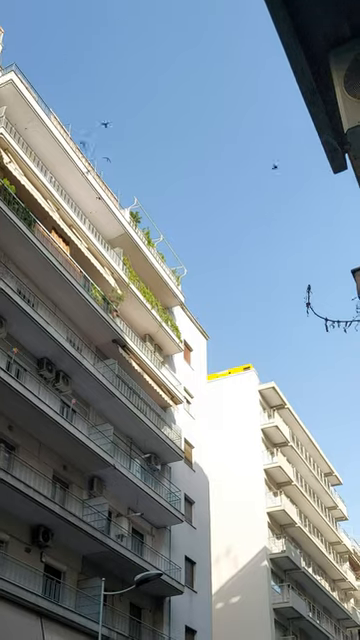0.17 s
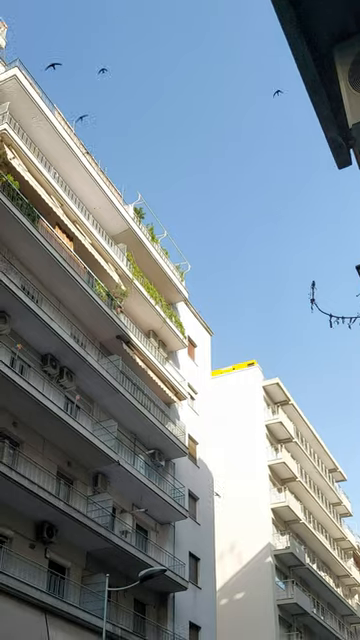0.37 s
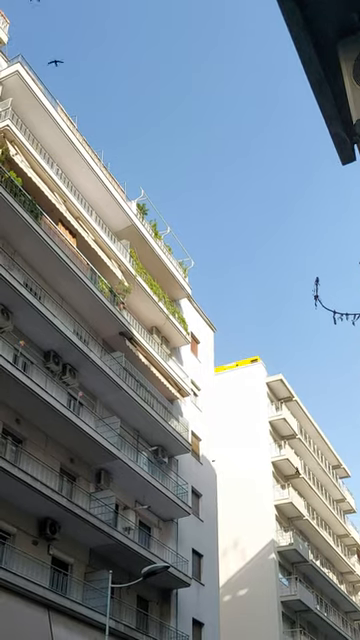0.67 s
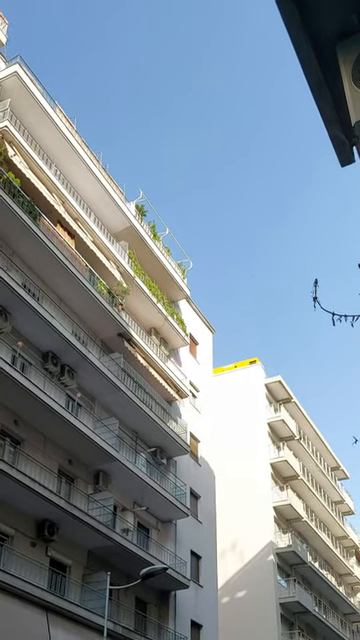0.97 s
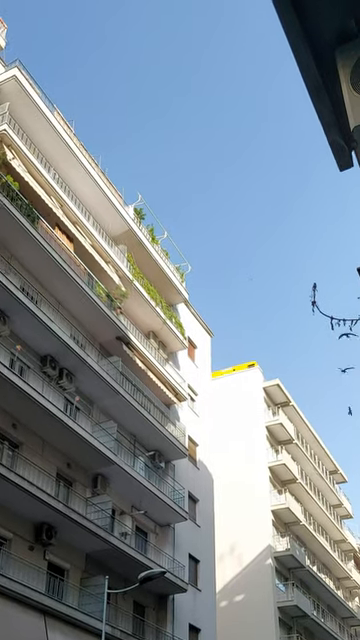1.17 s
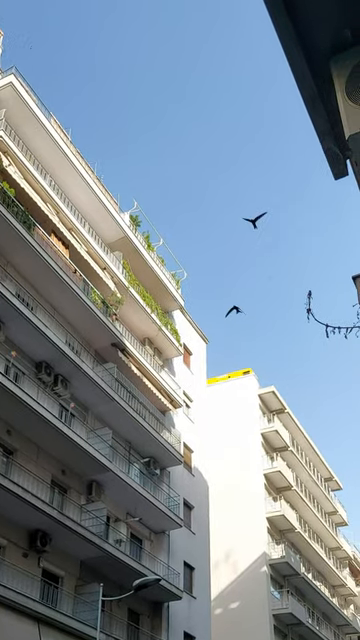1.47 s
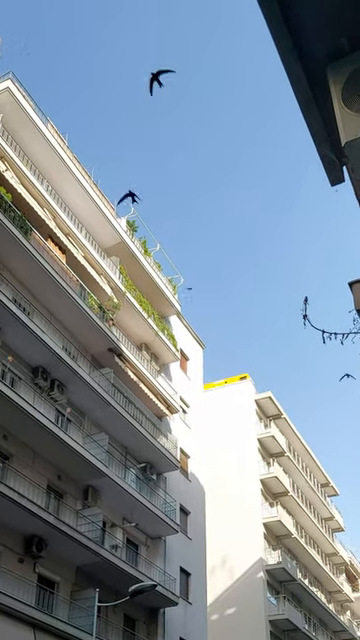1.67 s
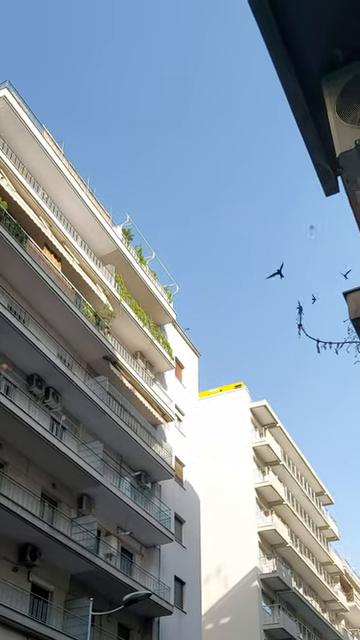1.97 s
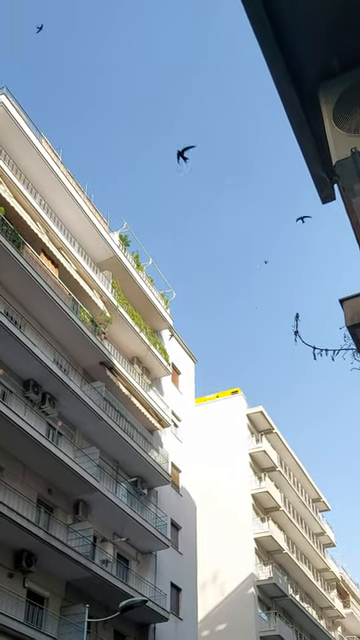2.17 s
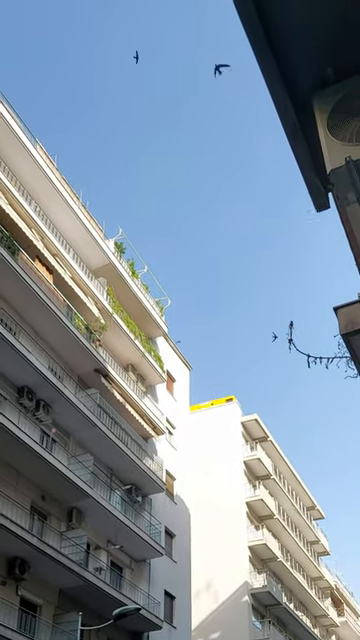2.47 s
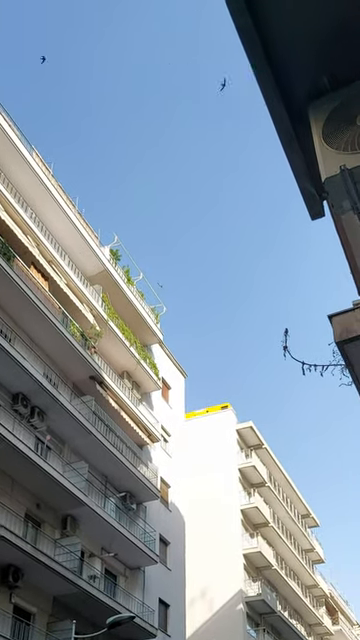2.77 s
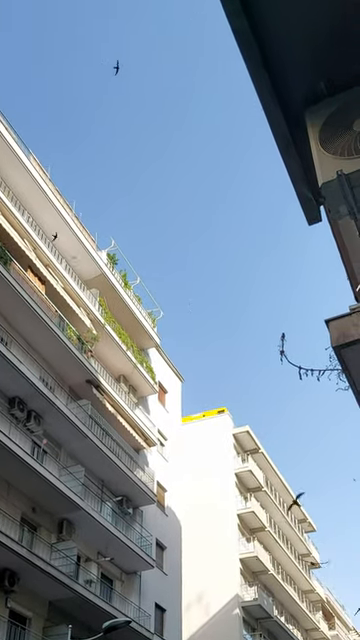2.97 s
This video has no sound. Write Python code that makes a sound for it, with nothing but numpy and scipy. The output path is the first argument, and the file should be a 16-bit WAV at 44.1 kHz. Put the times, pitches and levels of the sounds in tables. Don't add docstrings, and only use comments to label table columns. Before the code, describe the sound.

Shrill whistling swift screams, some ending in a low rasp, come in two flurries with long wall echoes; a lorry's deep rumble fades beneath the city wash, on a phone outdoors.

```python
import sys
import numpy as np
from scipy import signal
from scipy.fft import rfft, irfft
from scipy.io import wavfile
from scipy.ndimage import uniform_filter1d, map_coordinates

SR = 44100
rng = np.random.default_rng(int(sys.argv[2]) if len(sys.argv) > 2 else 0)


def elevation(decibels):
    levels = np.asarray(decibels, float)
    return 10 ** (levels / 20)


def master(y):
    cut = np.clip(np.atleast_2d(y).T, -1, 1)
    pcm = np.round(cut * 32767)
    wavfile.write(sys.argv[1], SR, pcm.astype(np.int16))


N = 138033


def evened(x):
    return x / np.sqrt(np.mean(x ** 2) + 1e-20)


def read(points, hz):
    f, value = np.transpose(points)
    return np.interp(np.log(hz + 1), np.log(f + 1), value)


def add(mix, s, sound):
    at = round(s * SR)
    sound = sound[max(-at, 0):]
    part = mix[max(at, 0):][:len(sound)]
    part += sound[:len(part)]


def wander(size, s):
    k = max(round(s * SR), 2)
    noise = rng.standard_normal(size)
    return evened(uniform_filter1d(uniform_filter1d(noise, k), k))


def coloured(x, table_db):
    gain = elevation(table_db(np.fft.rfftfreq(x.shape[-1], 1 / SR)))
    return irfft(rfft(x) * gain, x.shape[-1])


def ramps(t, length, attack_s, release_s):
    return np.clip(np.minimum(t / attack_s, (length - t) / release_s), 0, 1)


def wash(table, db, patchy_db, curve):
    # pitch_hz, likeness (share)
    likeness = [(40, 0.982), (180, 0.96), (350, 0.874), (700, 0.202), (1500, 0)]
    frames, hz = N // 512 + 5, np.fft.rfftfreq(2048, 1 / SR)
    a, b, c, d, patches = rng.standard_normal((frames, 1025, 5)).T
    patches = evened(uniform_filter1d(uniform_filter1d(patches, 14, 0), 6, 1))
    same = np.clip(read(likeness, hz), 0, 1)[:, None]
    left = a + 1j * b
    right = same * left + np.sqrt(1 - same ** 2) * (c + 1j * d)
    frame_s = np.arange(frames) * 512 / SR
    level_db = read(table, hz)[:, None] + patchy_db * patches + curve(hz[:, None], frame_s)
    z = np.array([left, right]) * elevation(level_db)
    return elevation(db) * evened(signal.istft(z, nperseg=2048, noverlap=1536)[1][:, :N])


def city():
    # pitch_hz, level_db (per Hz)
    far_streets = [(88, -38), (150, -3.5), (177, -16), (361, -9), (439, -11), (681, -13.5), (785, -11),
                   (3300, -25.5), (4290, -29), (7260, -120)]
    # pitch_hz, level_db (per Hz)
    hiss = [(2500, -69.5), (3300, 1.5), (6000, -1), (8200, -3), (8900, -17), (12000, -14.5), (15800, -21)]
    # time_s, level_db
    swell = [(0, 0.5), (.6, 2), (1.0, 1.5), (1.7, -0.5), (2.3, .5), (3.13, 1)]
    traffic = lambda hz, t: np.interp(t, *np.transpose(swell)) + 0 * hz
    return wash(far_streets, -39.5, 0.764, traffic) + wash(hiss, -56.5, 0.524, traffic)


def rumble():
    # pitch_hz, level_db (per Hz)
    engines = [(18, -42.5), (30, -27.5), (48, 1), (78, 6), (135, -2.5), (166, -20), (194, -3.5),
               (220, -6.5), (290, -13), (480, -120)]
    # time_s, level_db
    lorry = [
        (0, 6),
        (1.0, -4),
        (1.6, -48),
        (3.13, -25.5),
    ]
    leaving = lambda hz, t: np.interp(t, *np.transpose(lorry)) * (hz < 62)
    return wash(engines, -37.5, 0.94, leaving)


def squeaks():
    # start_s, length_s, pitch_hz, level_db
    tones = [
        (0.086, 0.185, 1723, -50.5),
        (0.46, 0.253, 1613, -48),
        (0.546, 0.32, 690.5, -48),
        (1.358, 0.133, 1020, -45),
    ]
    out = np.zeros(N)
    for start, length, hz, db in tones:
        t = np.arange(0, length, 1 / SR)
        pitch = hz * (1 - 0.01267 * t / length + 0.0086 * wander(len(t), 0.0497))
        level = elevation(db + 5.97 * wander(len(t), 0.051)) * np.sin(np.pi * t / length)
        add(out, start, level * np.sin(2 * np.pi * np.cumsum(pitch) / SR))
    return out * elevation([[1.5], [-1.5]])


def syrinx(hz, partials_db, warble, jitter, flutter_db, jitter_s=0.001572):
    n = len(hz)
    warble_per_s = 370 * (1 + .1 * wander(n, .01))
    beat = np.sin(2 * np.pi * np.cumsum(warble_per_s) / SR)
    pitch = hz * (1 + warble * beat + jitter * wander(n, jitter_s) + .003 * wander(n, .012))
    turn = 2 * np.pi * np.cumsum(pitch) / SR
    voice = np.zeros(n)
    for k, db in enumerate(partials_db):
        voice += elevation(db + flutter_db * wander(n, 0.00384)) * np.sin((k + 1) * turn)
    return np.sqrt(2) * voice


def far_scream(start, length, top_hz, db, rise):
    far_partials = (-2, -22, -28)
    t = np.arange(0, length, 1 / SR)
    low = np.clip(1 - t / rise, 0, 1) ** 1.6
    fall = np.clip((t / length - 1) / 0.64 + 1, 0, 1) ** 2
    hz = top_hz * (1 - 0.1 * low - 0.11 * fall - 0.055 * t / length)
    shape = np.sin(np.pi * t / length) ** .6 * elevation(db - 3 * low)
    return start, shape * syrinx(hz, far_partials, warble=.05, jitter=.04, flutter_db=3.0)


def rasp(start, length, hz, db):
    rasp_partials = (5.5, -5, -12.5)
    t = np.arange(0, length, 1 / SR)
    shape = ramps(t, length, 0.00303, 0.0154) * elevation(db - 3.76 * t / length)
    falling = hz * (1.03 - .08 * t / length)
    return start, shape * syrinx(falling, rasp_partials, warble=.02, jitter=.068, flutter_db=2.0, jitter_s=.0006)


def scream(arch, hoarse, overtones_db):
    near_partials = (0, -24, -21)
    s, hz, db = np.transpose(arch)
    length = s[-1] - s[0]
    t = np.arange(s[0], s[-1], 1 / SR)
    fray = 1 + 2 * ((t - s[0]) / length) ** 2
    hz = uniform_filter1d(np.interp(t, s, hz), round(0.014 * SR), mode="nearest")
    shape = ramps(t - s[0], length, .005, .015) * elevation(np.interp(t, s, db))
    partials_db = near_partials + overtones_db * np.array([0, 1, 1])
    warble, jitter = .008 * fray, .004 * fray * hoarse ** 2
    return s[0], shape * syrinx(hz, partials_db, warble, jitter, flutter_db=3.0)


def street(x, gap_s):
    # pitch_hz, t60_s
    decay = [(3500, 2.66), (5500, 1.475), (8000, 0.74), (13000, 0.82)]
    out, turn = np.zeros((2, N)), np.arange(N) / SR * 3 * np.pi
    for k in range(3):
        late = np.clip(np.arange(2 * SR) / SR / gap_s - .5, 0, 1)
        taps = rng.standard_normal((2, 2 * SR)) * late
        hz, t, z = signal.stft(taps, SR, nperseg=256)
        slope = -60 * t / read(decay, hz)[:, None]
        fading = elevation(slope) + 0.84 * elevation(3.44 * slope)
        tail = signal.istft(z * fading, SR, nperseg=256)[1]
        doppler = np.cumsum(.015 * wander(N, .015))
        moved = map_coordinates(x, [np.arange(N) + doppler], order=5)
        facing = moved * np.cos(turn + k * np.pi / 3)
        out += signal.fftconvolve(facing[None], tail / np.linalg.norm(tail[0]), axes=1)[:, :N]
    return out * np.sqrt(2 / 3)


def swifts():
    # time_s, pitch_hz, level_db
    first_flock = [
        [(.42, 4124, -51), (.47, 4303, -47.5), (.52, 4412, -49), (.575, 4517, -53)],
        [(.162, 4000, -37), (.19, 4717, -33.5), (.215, 5022, -31.5), (.24, 4977, -32.5), (.265, 4828, -39),
         (.29, 5015, -42), (.32, 4650, -51)],
        [(.575, 4380, -43), (.61, 4688, -33.5), (.665, 4823, -37.5), (.72, 4616, -36), (.8, 4466, -41)],
        [(.605, 4730, -33.5), (.635, 5144, -30.5), (.655, 5269, -31), (.7, 5113, -34.5), (.75, 4812, -36),
         (.79, 4706, -44)],
        [(.67, 5150, -42.5), (.7, 5484, -38), (.76, 5347, -43.5), (.82, 5320, -46)],
        [(.865, 4500, -35.5), (.885, 4700, -34), (.925, 4240, -45.5)],
    ]
    # time_s, pitch_hz, level_db
    second_flock = [
        [(1.74, 4400, -53.5), (1.765, 4765, -44.5), (1.83, 4930, -40.5), (1.88, 4880, -39.5),
         (1.95, 4240, -49.5)],
        [(1.965, 4194, -44.5), (1.982, 4214, -36.5), (2.0, 4650, -34.5), (2.03, 4680, -32.5),
         (2.065, 4639, -26.5), (2.095, 4451, -30.5), (2.105, 4540, -40.5), (2.135, 4468, -42.5)],
        [(2.34, 3842, -43), (2.358, 4050, -37), (2.372, 4300, -36), (2.39, 4020, -37), (2.43, 3509, -39.5)],
        [(2.692, 4350, -53.5), (2.708, 4860, -34.5), (2.73, 4900, -29), (2.748, 4760, -31.5), (2.76, 4670, -27),
         (2.77, 4720, -33), (2.785, 4790, -27), (2.798, 4740, -33.5), (2.81, 4729, -32), (2.85, 4265, -32)],
        [(2.9, 4540, -31.5), (2.935, 5091, -39.5), (2.965, 5281, -38), (3.02, 4920, -32.5)],
        [(2.935, 4000, -35), (2.965, 4356, -39), (2.995, 4667, -33), (3.025, 4440, -35.5), (3.045, 4042, -32.5),
         (3.065, 4021, -35)],
    ]
    # hoarseness (factor), overtones_db, left_right_db
    voices = [(1.566, 2, 12.5), (1.38, 3, 1.5), (1.14, 1.5, 6.5), (1.178, 2.5, 5.5), (1.4, 6, 14.5),
              (1.04, -3, -2), (1.04, 5, 1), (0.96, 2.5, 0.5), (2.4, 3.5, 2.5), (.9, 3, 3), (1.07, -13.5, 9),
              (2.5, 3, -0.5)]
    # start_s, length_s, top_pitch_hz, level_db, rise_s
    far_calls = [(-.05, 0.25, 5689, -48.5, .02), (-.05, 0.32, 4464, -48, .02),
                 (0.41, 0.1686, 4623, -39, .12), (.66, .16, 5100, -43.5, 0.02905),
                 (0.781, .12, 5276, -49.5, 0.0288), (0.98, 0.089, 4640, -50.5, 0.027),
                 (1.348, .15, 5834, -59, 0.086), (2.182, 0.069, 4842, -51.5, 0.0373),
                 (2.95, 0.14, 5250, -46.5, 0.041), (3.055, 0.096, 4872, -51, 0.0267),
                 (3.021, 0.105, 5620, -50.5, .04), (0.709, 0.33, 5620, -56.5, 0.046)]
    rasp_starts = [.04, .282, .76, .895, 1.0, 2.105, 2.16, 2.36, 2.845, 2.97, 3.04]
    # length_s, pitch_hz, level_db
    rasps = [(0.056, 4100, -49.5), (0.11, 3950, -42.5), (0.09, 4200, -46), (0.075, 4050, -43),
             (0.0574, 4700, -54), (0.0582, 3900, -43.5), (.09, 3900, -54.5), (0.04, 3800, -51.5),
             (0.057, 3950, -41.5), (0.058, 4050, -44), (0.048, 3400, -54.5)]
    # pitch_hz, echo_over_direct_db
    scatter = [(6500, 0), (8500, 4), (13000, 7)]
    # pitch_hz, level_db
    air = [(3000, -11.5), (3700, -3.5), (4400, 2), (5400, -0.5), (6200, 3.5), (8000, 0.5), (11000, -0.5),
           (15000, 4.5)]
    deep, near, harsh, far, left, right = np.zeros((6, N))
    for k, (arch, (hoarse, overtones_db, pan_db)) in enumerate(zip(first_flock + second_flock, voices)):
        s, call = scream(arch, hoarse, overtones_db)
        add(near if 6 <= k < 10 else deep, s, call)
        add(left, s, elevation(pan_db / 2) * call)
        add(right, s, elevation(-pan_db / 2) * call)
    for start, row in zip(rasp_starts, rasps):
        add(harsh, *rasp(start, *row))
    for row in far_calls:
        add(far, *far_scream(*row))
    rough = elevation(-3) * harsh + elevation(-14) * far
    direct = deep + near + rough
    left_port = 0.492 * left + rough + .3 * np.roll(direct, 410)
    right_port = 0.664 * np.roll(right, 1) + 0.546 * rough + .3 * np.roll(direct, 690)
    sent = elevation(2.5) * deep + elevation(-5) * near + elevation(6) * harsh + elevation(9) * far
    tail = street(sent, gap_s=.025)
    half_db = lambda hz: read(scatter, hz) / 2
    pair = coloured(np.array([left_port, right_port]), lambda hz: -half_db(hz))
    heard = pair + elevation(-8) * coloured(tail, half_db)
    return coloured(heard, lambda hz: read(air, hz))


def scene():
    return city() + rumble() + squeaks() + swifts()


def masked_treble(x):
    # pitch_hz, depth_db
    mask = [(5200, 29), (5900, 30), (6600, 36), (7300, 48), (9000, 56), (10800, 41), (12500, 44),
            (13600, 66), (15200, 50)]
    hz, t, z = signal.stft(x, SR, "cosine", nperseg=2048)
    power = (abs(z[:, :1024]) ** 2).mean(0).reshape(64, 16, -1).sum(1)
    band_hz = hz[:1024:16, None]
    loudest = (power * (band_hz > 3500)).max(0)
    loudest = signal.lfilter([.4], [1, -.6], loudest)
    depth_db = read(mask, band_hz) - 8 * (t > 2.73) + 2 * rng.standard_normal(power.shape)
    weak = (power * elevation(2 * depth_db) < loudest) & (band_hz > 5100)
    keep = np.vstack([np.repeat(~weak, 16, 0), ~weak[:1]])
    return signal.istft(z * keep, SR, "cosine", nperseg=2048)[1][:, :N]


def top_cut(x):
    return signal.sosfilt(signal.butter(12, 15890, fs=SR, output="sos"), x)


def record(dry):
    # pitch_hz, left_right_db
    balance = [(60, -1), (130, -.5), (290, -3.5), (640, 1), (1410, -10.5), (3100, -1.5), (4600, -3.5),
               (6820, -0.5), (15000, 6)]
    half = np.array([[.5], [-.5]])
    ports = coloured(dry, lambda hz: half * read(balance, hz) - 90 * (hz > 15790))
    opening = np.clip((np.arange(N) / SR - .069) / 0.00227, 0, 1)
    return top_cut(masked_treble(ports) * opening)


dry = scene()
out = record(dry)
master(out)
```